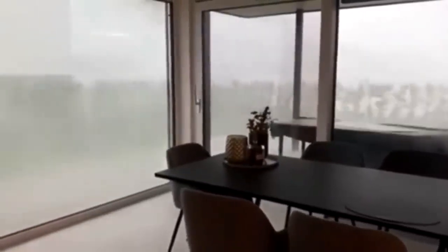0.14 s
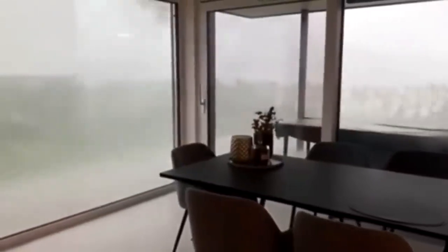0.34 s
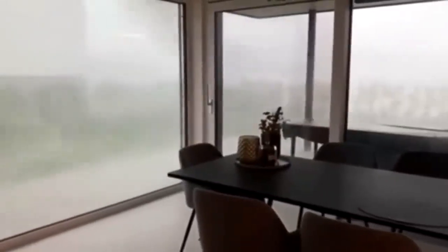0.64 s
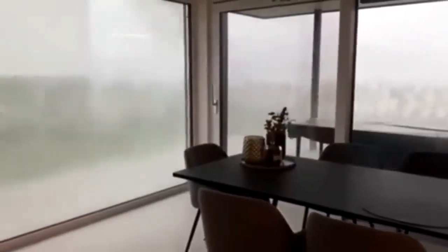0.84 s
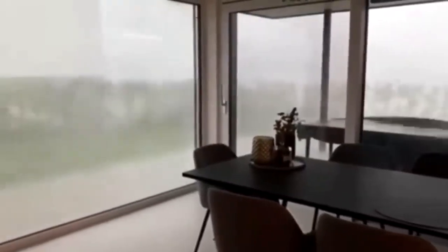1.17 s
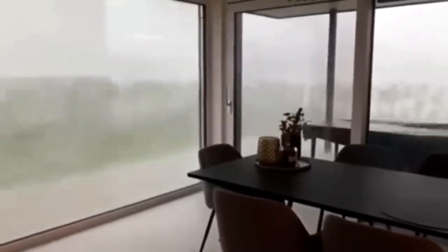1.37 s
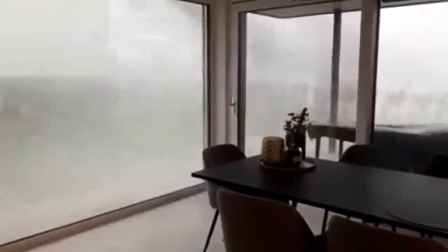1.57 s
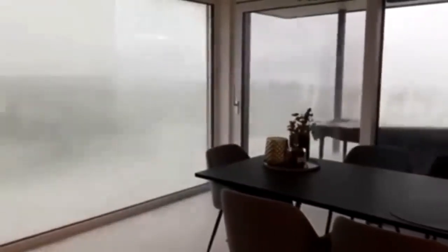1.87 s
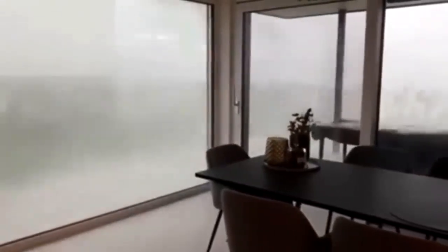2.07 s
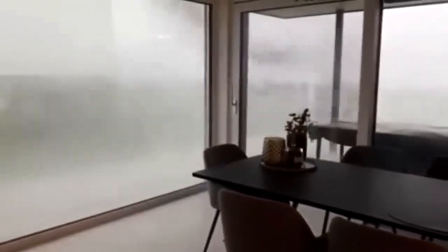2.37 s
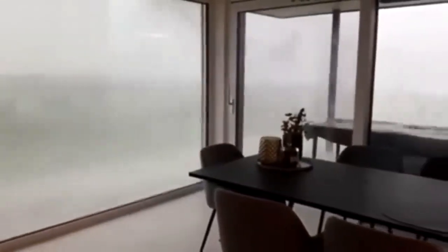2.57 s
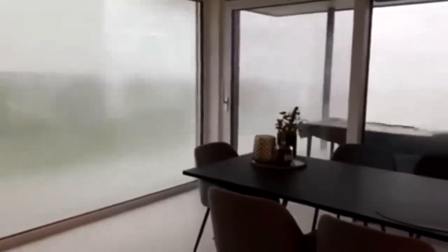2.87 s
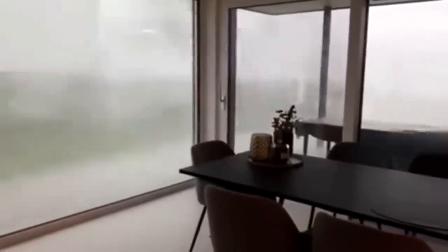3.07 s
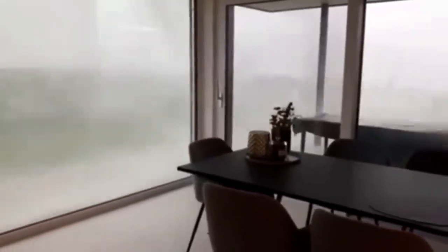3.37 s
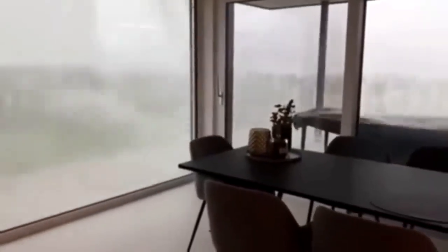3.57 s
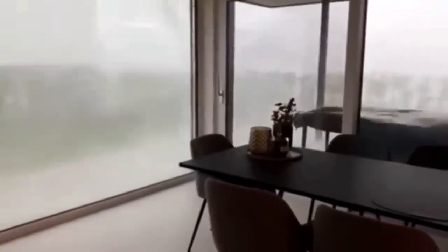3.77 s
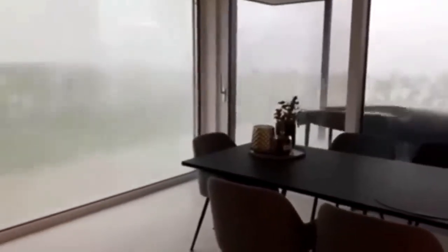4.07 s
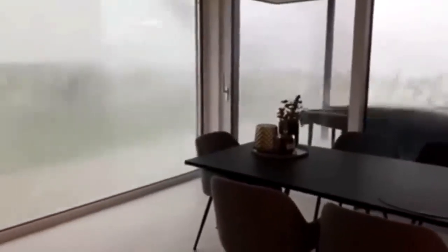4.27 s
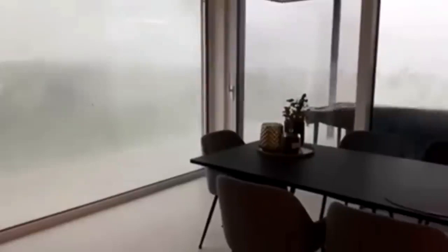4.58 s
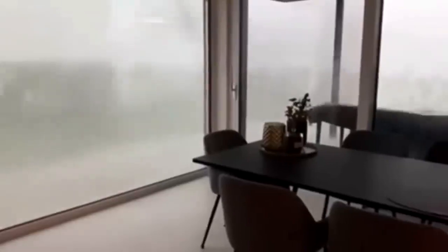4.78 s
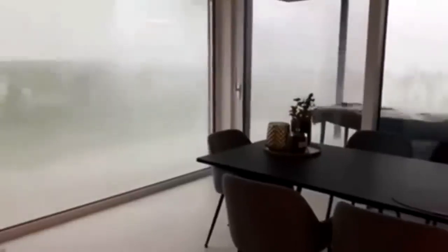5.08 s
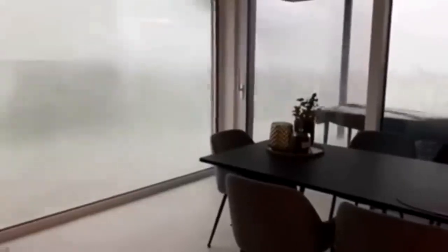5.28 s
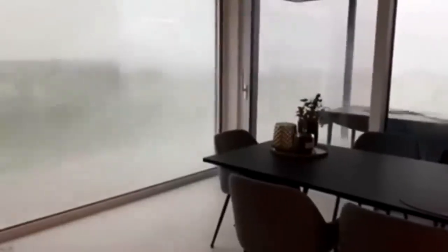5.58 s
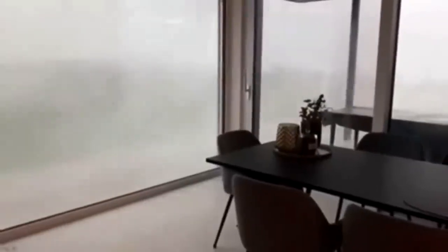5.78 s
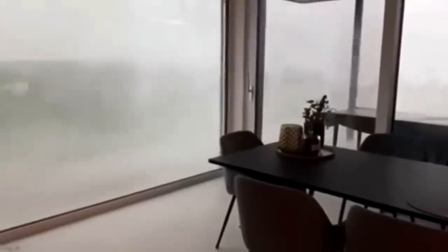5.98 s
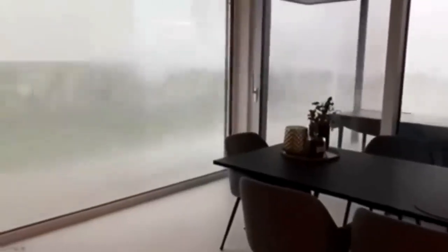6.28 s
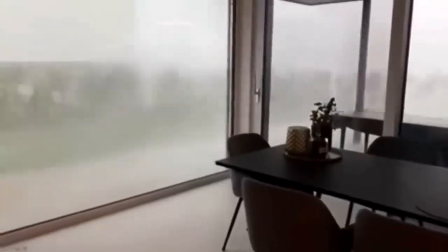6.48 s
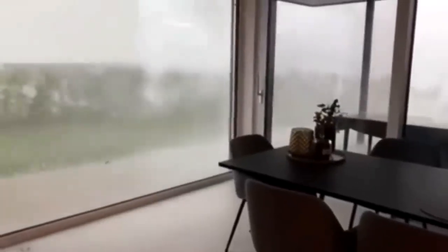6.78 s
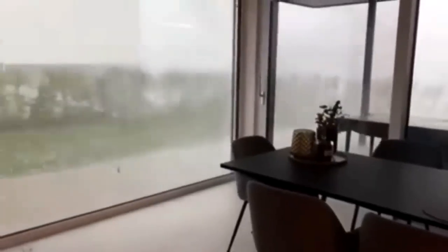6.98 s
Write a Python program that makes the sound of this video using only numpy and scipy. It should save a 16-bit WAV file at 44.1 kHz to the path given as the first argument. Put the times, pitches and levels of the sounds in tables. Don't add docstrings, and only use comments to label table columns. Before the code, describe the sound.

From inside a bare room, wind hurls dense rain at big panes: a steady surging wash with thumps, watery slaps and crackling drops.

```python
import sys
import numpy as np
from scipy import signal
from scipy.fft import rfft, irfft
from scipy.io import wavfile
from scipy.ndimage import uniform_filter1d

SR = 44100
rng = np.random.default_rng(int(sys.argv[2]) if len(sys.argv) > 2 else 0)


def unload_audio(sound):
    columns = np.transpose(np.atleast_2d(sound))
    steps = np.round(np.clip(columns, -1, 1) * 32767)
    wavfile.write(sys.argv[1], SR, steps.astype(np.int16))


def gain_from_decibels(decibels):
    exponent = np.asarray(decibels, float) / 20
    return 10 ** exponent


N = 314640
T_S = np.arange(N) / SR
HZ = np.arange(N // 2 + 1) * SR / N + 1e-3
DROPS_PER_S = 9000
RISE_SHARE = 0.53

# frequency in Hz, level in dB per Hz.
GLASS_DB = [(60, -1), (110, -10.5), (160, -4.5), (300, -1.5), (500, -7), (850, -9.5), (1200, -13),
            (1750, -14.5), (2050, -8), (2800, -10.5), (4000, -16.5), (5500, -27), (7900, -37.5),
            (11000, -48.5), (12300, -51.5)]
# frequency in Hz, side minus mid in dB.
WIDTH_DB = [(40, -23), (110, -18.5), (190, -12), (350, -6), (620, -1.5), (1100, -1.5), (2000, -0.5),
            (4000, -5), (5800, -0.5), (9000, 0), (11000, 0)]
# frequency in Hz, width in Hz, lift in dB.
ROOM_MODES = [(123.7, 29, 8), (155, 15, 5), (169, 21, 2), (233, 12, 3), (296, 23, 3.5), (356, 7.2, 5),
              (207, 16, 3), (250, 19, 2), (482, 20, 3), (530, 18, 2.5), (596, 10, 3.5), (388, 12, 3.5),
              (434.4, 11.5, 5.5), (714, 27, 4), (847, 280, 2.5)]
# frequency in Hz, width in Hz, level in dB.
RUMBLE_MODES = [
    (55, 14, 4),
    (74, 12, 8.5),
    (88.5, 10, 10.5),
]
# start in seconds, peak in dB.
TICKS = [(1.009, -54), (1.437, -55), (2.404, -55), (2.606, -53), (2.74, -52), (3.215, -53), (3.238, -41.5),
         (3.44, -56), (4.08, -52), (4.278, -50), (4.32, -56), (4.666, -54), (5.892, -49), (6.49, -53),
         (6.572, -49)]
# start in seconds, peak in dB, centre in Hz.
SPLASHES = [(0.2033, -14.5, 2830), (0.2884, -17, 2420), (0.4484, -15.5, 2090), (0.5417, -23, 2520),
            (0.6245, -21.5, 2600), (0.7605, -16.5, 2620), (0.988, -17.5, 2470), (1.3262, -17.5, 2400),
            (1.4411, -17, 2750), (1.4614, -13, 2410), (1.5284, -14, 2190), (1.6134, -18, 2390),
            (1.7978, -18.5, 2150), (1.945, -21, 1990), (2.2864, -19.5, 2240), (2.4754, -23.5, 2310),
            (2.5244, -19, 2680), (2.5651, -14, 2140), (2.66, -18, 2530), (2.6925, -26, 2110),
            (2.7334, -19, 2500), (2.7964, -15, 2100), (2.8924, -17.5, 2770), (3.1584, -18.5, 2540),
            (3.2106, -27, 2060), (3.4184, -17, 2650), (3.4474, -17.5, 2140), (3.5743, -17.5, 2900),
            (3.6685, -18, 2530), (3.8152, -17, 2880), (3.8834, -14.5, 2640), (4.0164, -22, 2580),
            (4.2554, -15.5, 2860), (4.338, -20, 2830), (4.4454, -18, 2200), (4.5335, -16.5, 2570),
            (4.6284, -13, 3040), (4.7637, -15.5, 2670), (4.8259, -24, 2150), (4.8624, -17, 2170),
            (5.0124, -24, 2110), (5.1084, -17.5, 2320), (5.1986, -21, 2040), (5.2524, -16, 2730),
            (5.6324, -19.5, 2020), (5.7074, -18, 2210), (5.7668, -17, 2800), (5.8756, -17.5, 2410),
            (6.0473, -20.5, 2700), (6.103, -22, 2040), (6.1364, -23, 1950), (6.2784, -18, 2800),
            (6.456, -25, 2340), (6.4984, -17, 2690), (6.6251, -18, 2750), (6.6598, -17, 2490),
            (6.7166, -16, 2120), (6.8134, -13.5, 2170), (6.9326, -22, 2010), (7.0823, -16, 2300)]
# time in seconds, level in dB.
LOAD_DB = [(0.0, 4), (0.49, -2.5), (0.81, 2.5), (0.97, -1.5), (1.55, 0), (1.99, -2.5), (2.33, 0.2),
           (3.26, -1.5), (3.46, 1), (3.57, -0.5), (4.18, 3), (4.45, 0.6), (5.3, 1.2), (5.37, -1.5),
           (6.25, 2), (6.48, 0), (6.5, 2), (7.13, 1.4)]
# time in seconds, level in dB.
RAIN_DB = [(0.0, -2.5), (0.42, -1.5), (0.54, -1.5), (1.52, 0.9), (1.73, -0.5), (1.93, -1.5), (2.54, 1),
           (3.04, -1.5), (3.45, 1.3), (3.51, -0.7), (4.14, 0.85), (5.06, 0.5), (5.29, 0.5), (5.4, -2),
           (5.8, 0.5), (6.45, 0.3), (6.49, 2.5), (7.13, -2)]
# centre in seconds, height in dB, half length in seconds.
BUFFETS = [(0.02, -2, 0.06), (0.14, -2.5, 0.094), (0.4, 0, 0.051), (0.62, 3, 0.063), (0.72, -3, 0.047),
           (1.4, 1, 0.074), (1.49, 1.5, 0.036), (1.59, 2, 0.06), (1.79, -1, 0.043), (1.89, 1.5, 0.07),
           (2.02, -2, 0.076), (2.16, 1, 0.086), (2.56, 2, 0.047), (2.74, 1, 0.07), (2.97, 2, 0.082),
           (3.12, 4, 0.051), (3.82, -1.5, 0.07), (3.94, 1.5, 0.1), (4.06, -1.5, 0.14), (4.51, -1, 0.072),
           (4.69, 1.5, 0.058), (4.88, -1, 0.034), (5.61, 3, 0.06), (5.82, 0, 0.058), (6.03, -2.5, 0.054),
           (6.15, 1.5, 0.07), (6.4, -1, 0.066), (6.48, 1.8, 0.031), (6.85, -2.5, 0.074)]
# centre in seconds, height in dB,
# half length in seconds, extra of fine spray over coarse drops in dB.
SHEETS = [(0.02, 3, 0.07, 1.5), (0.12, -1, 0.054, 1.5), (0.26, 1.5, 0.093, -0.5), (0.58, 2, 0.083, 0),
          (0.77, 4, 0.047, 1), (0.93, -1, 0.076, 0.5), (1.23, -1, 0.14, -1.5), (1.35, 1, 0.044, -2),
          (1.46, 2.5, 0.077, 0), (1.76, -1.5, 0.033, 3), (1.81, 1, 0.045, 0), (2.79, 1.5, 0.042, -1),
          (3.03, -1.5, 0.042, 0.5), (3.11, 0, 0.057, -2), (3.42, 2.5, 0.019, 2.5), (3.75, -2.5, 0.077, -2),
          (3.88, 1, 0.08, 0), (4.3, 0.5, 0.12, 0.5), (4.46, -1.5, 0.15, 0.5), (4.69, 2, 0.089, -0.5),
          (4.88, -1.5, 0.091, 2.5), (5.04, -1, 0.049, -4.5), (5.99, -1, 0.082, -0.7),
          (6.17, 1.5, 0.17, 0.5), (6.28, -0.5, 0.029, -3), (6.37, -1.5, 0.079, 0), (6.76, -1.5, 0.051, 1.5),
          (6.82, 1, 0.088, -2), (7.01, -0.5, 0.048, 1), (7.1, -0.1, 0.061, -2)]
# frequency in Hz, dB per dB of load, dB per dB of rain,
# share of fine spray in dB per dB.
ANSWERS = [
    (250, 2, 0, 0.057),
    (950, 0.43, 0.97, -1),
    (2700, 0.12, 1.44, -0.72),
    (6000, 0.02, 1.42, 0.52),
]
# start in seconds, peak in dB, centre in Hz.
THUMPS = [(0.533, -18, 377), (0.742, -19, 152), (0.914, -22, 267), (1.158, -18.5, 444), (1.259, -16, 270),
          (1.344, -22.5, 345), (1.418, -11.5, 221), (1.521, -14.5, 408), (1.574, -13.5, 296),
          (1.624, -23, 320), (1.838, -23, 286), (2.09, -20, 161), (2.139, -11, 246), (2.194, -17, 229),
          (2.289, -15, 356), (2.34, -16, 183), (2.426, -16, 392), (2.552, -13, 250), (2.713, -13, 296),
          (2.797, -13.5, 165), (2.859, -11, 290), (3.235, -22.5, 282), (3.395, -10, 279), (3.484, -12, 295),
          (3.887, -9, 362), (3.951, -11, 218), (4.08, -25, 357), (4.148, -17, 278), (4.192, -16, 355),
          (4.251, -21, 213), (4.337, -16, 260), (4.388, -11.5, 157), (4.652, -10.5, 154),
          (4.766, -18.5, 250), (4.914, -8, 296), (4.963, -19, 296), (5.009, -27, 318), (5.051, -24, 256),
          (5.2, -10, 154), (5.296, -13.5, 290), (5.727, -17, 300), (5.787, -13.5, 298), (6.063, -18, 172),
          (6.151, -16.5, 296), (6.223, -12.5, 157), (6.277, -19, 299), (6.439, -19, 184), (6.599, -14, 287),
          (6.66, -19, 207), (7.045, -23, 237)]
# start in seconds, peak in dB, centre in Hz.
KNOCKS = [(0.228, -14, 579), (0.563, -21, 820), (1.022, -18.5, 700), (1.34, -28.5, 800),
          (1.453, -19.5, 1240), (1.504, -15, 830), (1.615, -19.5, 565), (1.733, -23, 470),
          (1.845, -16.5, 473), (2.339, -13, 638), (2.433, -20, 457), (2.506, -16, 685), (2.647, -16.5, 568),
          (2.702, -12.5, 473), (2.75, -23, 1360), (2.911, -17, 729), (2.951, -18, 584), (3.067, -28, 490),
          (3.238, -13.5, 580), (3.295, -13, 460), (3.498, -19, 755), (3.705, -21, 444), (3.888, -17, 848),
          (3.952, -25, 670), (4.048, -22, 547), (4.169, -19, 550), (4.287, -16, 690), (4.34, -13, 477),
          (4.586, -21, 780), (4.643, -26, 727), (4.741, -16, 774), (4.983, -22, 464), (5.032, -18, 820),
          (5.077, -16.5, 750), (5.125, -19, 824), (5.194, -15, 447), (5.274, -23, 584), (5.628, -18, 433),
          (5.771, -19, 592), (5.902, -21, 832), (6.119, -15, 704), (6.213, -17, 540), (6.317, -19, 537),
          (6.428, -18, 730), (6.48, -15, 720), (6.522, -21.5, 820), (6.578, -13, 646), (6.675, -18, 452),
          (6.741, -18, 600), (6.957, -19, 525)]
# start in seconds, peak in dB, centre in Hz.
SPRAYS = [(0.28, -23, 4060), (0.5374, -20, 3550), (0.7607, -19.5, 3720), (1.2356, -25, 3490),
          (1.4371, -18, 3340), (1.7823, -28, 3300), (2.3336, -31, 3460), (2.4039, -22, 3940),
          (2.4366, -20, 3390), (2.6298, -25.5, 4120), (2.743, -23, 3600), (2.7831, -23, 3420),
          (3.0865, -20, 3500), (3.2114, -23, 3310), (3.256, -22, 3470), (3.4156, -25, 4030),
          (3.5884, -23, 4450), (3.6593, -25.5, 4190), (3.9757, -24, 4100), (4.1061, -26, 3600),
          (4.1759, -24, 3400), (4.2333, -21, 3420), (4.3106, -21, 3850), (4.5245, -28, 3280),
          (4.6084, -21, 3670), (4.6843, -25, 3550), (4.7631, -25, 3640), (4.8883, -32, 3340),
          (4.9427, -26, 3480), (5.028, -20, 4500), (5.1128, -30, 3530), (5.2445, -27, 3550),
          (5.6338, -35, 3680), (5.7009, -29, 3450), (5.7543, -25, 3400), (5.8935, -29, 3570),
          (6.127, -22, 3360), (6.2633, -19.5, 4370), (6.491, -22, 3710), (6.569, -22.5, 3540),
          (6.6194, -21, 3360), (6.6653, -28, 3760), (6.822, -23, 3750), (6.8683, -24, 3300),
          (7.077, -20.5, 3320)]
# start in seconds, peak in dB.
CRACKS = [(0.1695, -20), (0.203, -19), (0.543, -22), (0.6226, -14.5), (0.7603, -15), (0.9883, -15),
          (1.3254, -16), (1.4427, -9), (1.7978, -17.5), (1.946, -24), (2.5656, -19), (2.6606, -15),
          (2.6925, -17), (2.7337, -20), (3.211, -21), (3.5724, -18), (3.6694, -19), (3.7469, -20),
          (4.338, -13), (4.5335, -14), (4.7643, -12), (4.8254, -18), (5.1078, -21), (5.1741, -24),
          (5.1983, -26), (5.6326, -16), (5.7674, -19), (5.8765, -19), (6.0462, -18), (6.104, -13),
          (6.456, -18.5), (6.6248, -13), (6.6596, -20), (6.717, -20), (6.783, -18), (6.9326, -23),
          (7.082, -16)]
# time in seconds, level in dB.
SHAKE_DB = [(0.0, -48), (0.1, -32), (0.12, -39), (6.11, -40), (7.13, -43)]


def on_log(table, hz):
    table_hz, value = np.transpose(table)
    return np.interp(np.log(hz), np.log(table_hz), value)


def curve(table):
    return np.interp(T_S, *np.transpose(table))


def unit(x):
    return x / np.sqrt(np.mean(x ** 2))


def smooth(x, length):
    return uniform_filter1d(uniform_filter1d(x, length), length)


def walk(rate_hz):
    hold = int(SR / rate_hz)
    steps = np.repeat(rng.standard_normal(N // hold + 1), hold)
    return unit(smooth(steps, hold)[:N])


def bell(hz, width_hz):
    return 1 / (1 + ((HZ ** 2 - hz ** 2) / (HZ * width_hz)) ** 2)


def ring(hz, width_hz):
    return 1 / (1 + 1j * (HZ ** 2 - hz ** 2) / (HZ * width_hz))


def even(x, hold_s, share):
    power = smooth(x[0] ** 2, int(hold_s * SR)) + 1e-30
    return x * (np.mean(power) / power) ** (share / 2)


def swells(table, column):
    out = np.zeros(N)
    for row in table:
        rise_s, fall_s = row[2] * RISE_SHARE, row[2] * (2 - RISE_SHARE)
        top_s = row[0] - (fall_s - rise_s) / 4
        near = slice(max(int((top_s - rise_s) * SR), 0), int((top_s + fall_s) * SR))
        from_top_s = T_S[near] - top_s
        out[near] += row[column] * np.cos(np.pi / 2 * from_top_s / np.where(from_top_s < 0, rise_s, fall_s)) ** 2
    return out


def load_db():
    return curve(LOAD_DB) + swells(BUFFETS, column=1)


def band(noise, hz, width):
    b, a = signal.butter(2, [hz / (1 + width), hz * (1 + width)], "band", fs=SR)
    return unit(signal.lfilter(b, a, noise))


def bursts(table, rise_s, fall_s, share_db, width, spread_db, spread, side_db):
    t = np.arange(SR // 6) / SR
    out = np.zeros((2, N + len(t)))
    shape = (1 - np.exp(-t / rise_s)) * np.exp(-t / fall_s)
    for s, db, hz in table:
        noise = rng.standard_normal((2, len(t)))
        modes = band(noise, hz, width) + gain_from_decibels(spread_db) * band(noise, hz, spread)
        start = int(s * SR)
        out[:, start:start + len(t)] += gain_from_decibels(db + share_db) * shape * modes
    return out[:, :N] * gain_from_decibels([[0], [side_db]])


def wind():
    shape = sum(gain_from_decibels(2 * db) * bell(hz, width_hz) for hz, width_hz, db in RUMBLE_MODES) * bell(54, 90)
    push = irfft(rfft(rng.standard_normal((2, N))) * np.sqrt(shape), N)
    push = push / np.sqrt(np.mean(push[0] ** 2))
    push = even(push, hold_s=0.16, share=0.99) * gain_from_decibels([[0], [-19]])
    return push * gain_from_decibels(curve(SHAKE_DB) + 0.1 * load_db() + 1.5 * walk(4.4))


def thumps():
    return bursts(THUMPS, 0.0041, 0.037, share_db=-8.5, width=0.073, spread_db=-14.5, spread=0.58, side_db=-18)


def ticks():
    t = np.arange(SR // 20) / SR
    out = np.zeros(N + len(t))
    for s, db in TICKS:
        start = int(s * SR)
        out[start:start + len(t)] += gain_from_decibels(db - 60 * t / 0.09) * rng.standard_normal(len(t))
    return irfft(rfft(out[:N]) * bell(12100, 3500), N) * gain_from_decibels(4.0)


def knocks():
    return bursts(KNOCKS, 0.004, 0.02, share_db=-9.5, width=0.056, spread_db=-6.5, spread=0.31, side_db=-6.0)


def sprays():
    return bursts(SPRAYS, 0.0031, 0.014, share_db=-8.0, width=0.13, spread_db=-10.0, spread=0.34, side_db=-7.0)


def cracks():
    s, db = np.transpose(CRACKS)
    sign, place, late = rng.random((len(CRACKS), 3)).T
    blow = gain_from_decibels(db + 0.5) * np.sign(sign - 0.5)
    ports = np.array([np.ones(len(s)), 0.6 * (2 * place - 1)])
    bounce_s = 0.002 + 0.0081 * late
    hits = np.zeros((2, N))
    for delay_s, gain in ((0, 1), (bounce_s, -0.6)):
        np.add.at(hits, (slice(None), ((s + delay_s) * SR).astype(int)), gain * blow * ports)
    glass = ring(2500, 1400) + gain_from_decibels(-11.5) * ring(4400, 3000)
    return irfft(rfft(hits) * glass, N) * gain_from_decibels(2.5)


def splashes():
    return bursts(SPLASHES, 0.0062, 0.016, share_db=-5.5, width=0.072, spread_db=-8, spread=0.41, side_db=-8.5)


def drops(scatter_db, biggest_db, t60_s, ring_db):
    when, size, place = rng.random((int(DROPS_PER_S * N / SR), 3)).T
    size = gain_from_decibels(np.minimum(-scatter_db * np.log(1 - size), biggest_db))
    angle = 2 * np.pi * place
    hits = [np.bincount((when * N).astype(int), size * f(angle), N) for f in (np.cos, np.sin)]
    t = np.arange(SR // 2) / SR
    tail = gain_from_decibels(ring_db - 60 * t / t60_s) * rng.standard_normal((2, len(t)))
    tail[:, 0] = 1
    phase = rfft(tail, N)
    return rfft(np.array(hits)) * phase / np.abs(phase)


def film(x, patchy_db, from_hz, to_hz):
    hz, _, z = signal.stft(x, SR, nperseg=2048, noverlap=1536)
    hz = hz + 1e-3
    patch = uniform_filter1d(rng.standard_normal(z.shape[1:]), size=5, axis=0)
    patch = unit(uniform_filter1d(patch, size=6, axis=1))
    reach = hz / (hz + from_hz) * to_hz / (hz + to_hz)
    z = z * gain_from_decibels(patchy_db * patch * reach[:, None])
    return signal.istft(z, SR, nperseg=2048, noverlap=1536)[1][:, :N]


def rain():
    controls_db = np.array([load_db(), curve(RAIN_DB) + swells(SHEETS, column=1), swells(SHEETS, column=3)])
    lift = 1 + sum((gain_from_decibels(2 * db) - 1) * bell(hz, width_hz) for hz, width_hz, db in ROOM_MODES)
    below = np.where(HZ < 110, bell(142, 60) ** 2, 1)
    colour = gain_from_decibels(on_log(GLASS_DB, HZ)) * np.sqrt(lift * below)
    ports = gain_from_decibels([0 * HZ, on_log(WIDTH_DB, HZ)])
    glass = drops(scatter_db=3.5, biggest_db=15.0, t60_s=0.1, ring_db=-19.5) * colour * ports
    answer_hz, *answers = np.transpose(ANSWERS)
    out = np.zeros((2, N))
    for centre_hz in 60 * 2 ** np.arange(0, 8.1, 0.5):
        share = np.cos(np.pi / 2 * np.clip(2 * np.log2(HZ / centre_hz), -1, 1)) ** 2
        weights = np.array([np.interp(np.log(centre_hz), np.log(answer_hz), a) for a in answers])
        depth = 1.004 * centre_hz / (centre_hz + 60)
        quick_db = 1.15 * walk(16) * min(centre_hz / 2100, 1)
        part = even(irfft(glass * share, N), hold_s=0.096, share=0.88)
        out += part * gain_from_decibels(depth * weights @ controls_db + quick_db)
    out = out / np.sqrt(np.mean(out[0] ** 2)) * gain_from_decibels(-23.5)
    return film(out, patchy_db=3.5, from_hz=1600, to_hz=9000)


def scene():
    mid, side = wind() + thumps() + knocks() + sprays() + cracks() + splashes() + rain()
    mid = mid + ticks()
    side = side + irfft(rfft(mid) * 0.1 * bell(750, 1500), N)
    return np.array([mid + side, mid - side])


def top_cut(x):
    return signal.sosfilt(signal.butter(12, 12400, fs=SR, output="sos"), x)


def record(dry):
    mix = np.tanh(1.357 * dry) / 1.445
    return top_cut(mix)


dry = scene()
out = record(dry)
unload_audio(out)
```